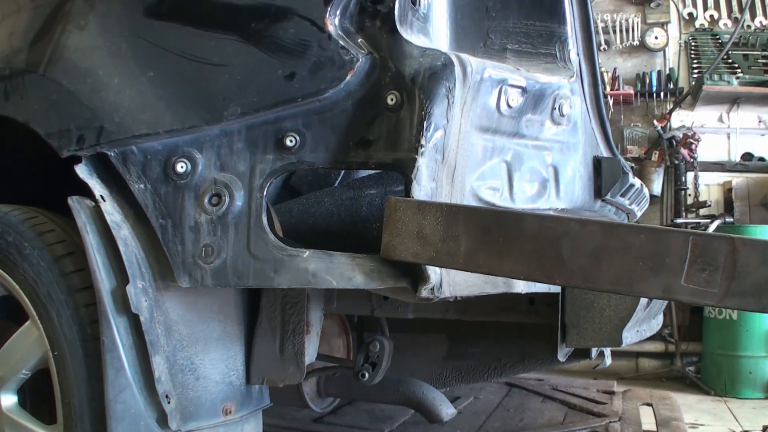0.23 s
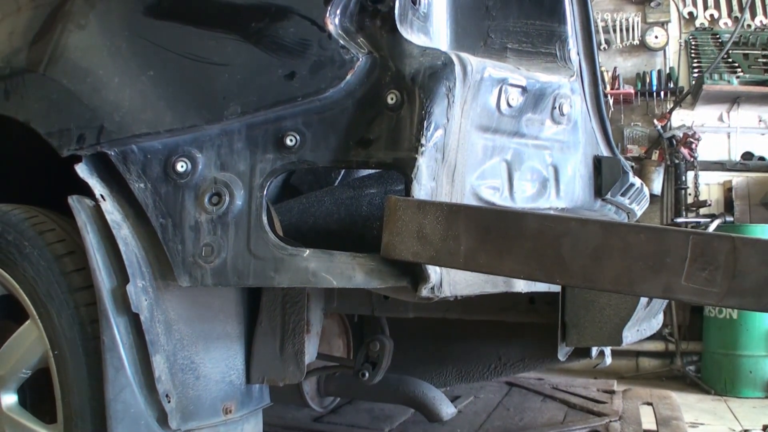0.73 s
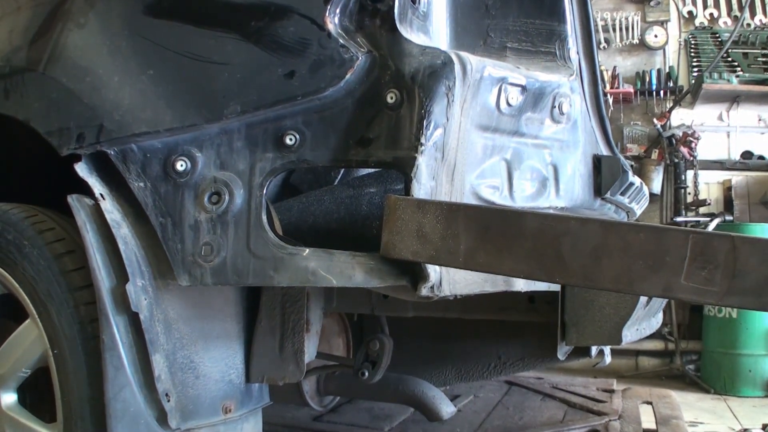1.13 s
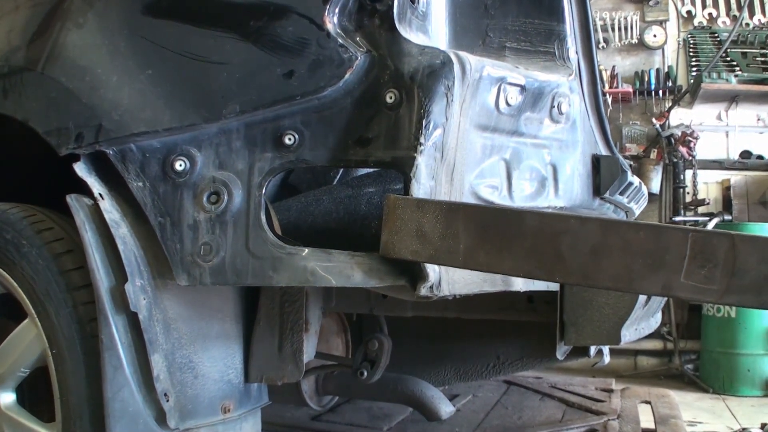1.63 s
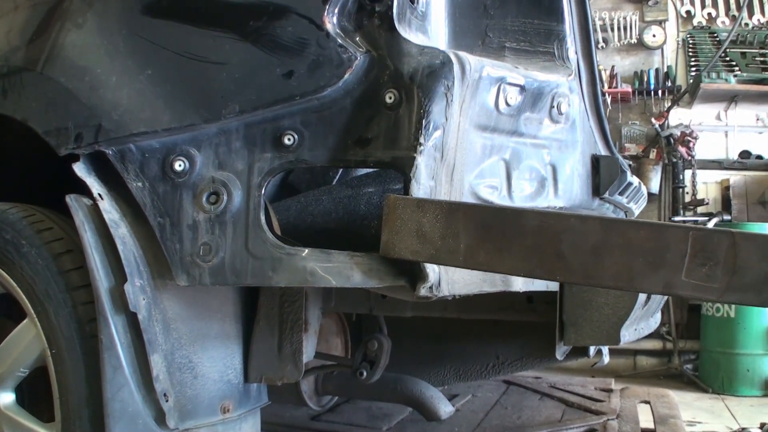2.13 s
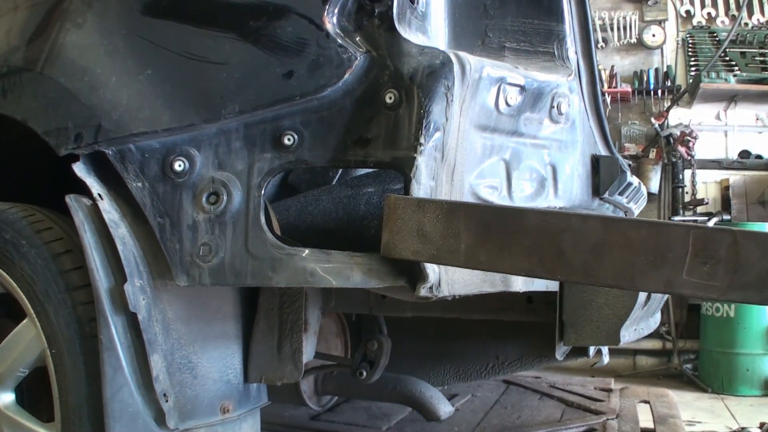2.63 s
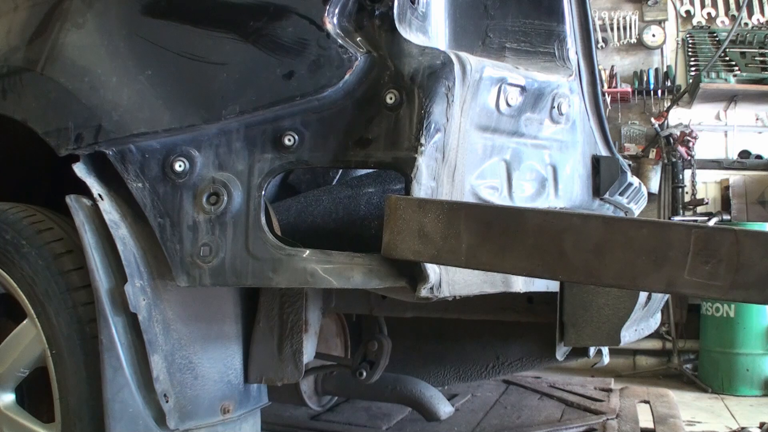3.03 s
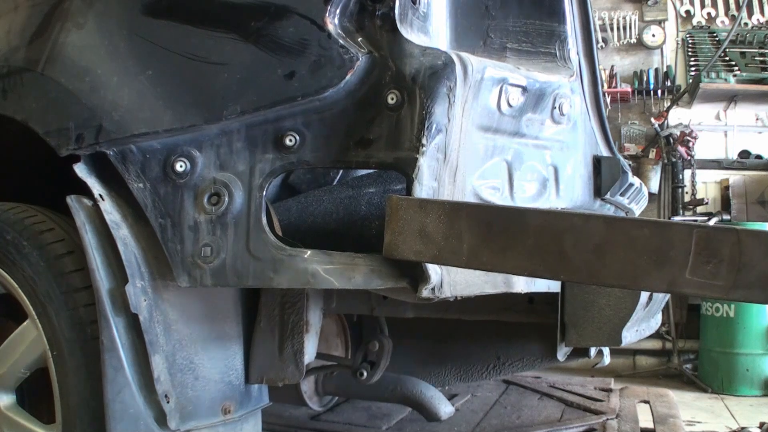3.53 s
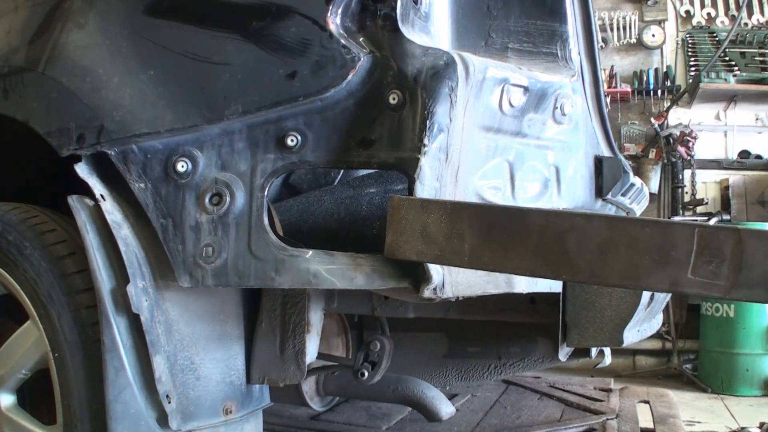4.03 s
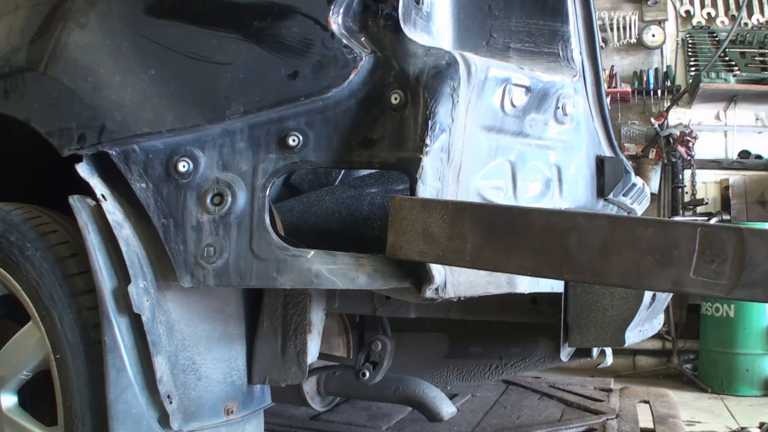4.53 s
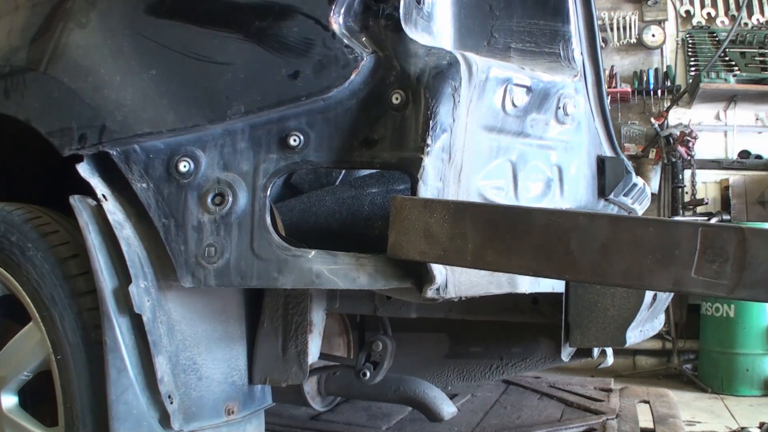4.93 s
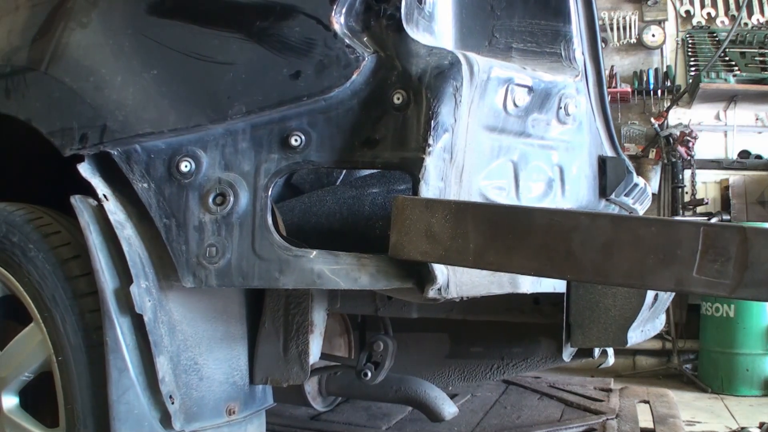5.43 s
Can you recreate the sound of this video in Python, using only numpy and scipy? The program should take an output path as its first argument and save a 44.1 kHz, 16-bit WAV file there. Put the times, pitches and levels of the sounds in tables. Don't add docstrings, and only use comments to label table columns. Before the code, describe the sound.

For the first 1.3 seconds a garage is fairly quiet: a compressor chugs at about twenty pulses a second over low rumble, and a hose leaks bright hiss that surges near 0.25, 0.6 and 0.95 seconds. At 0.54 a dropped tool taps and rings briefly. At 1.3 a valve handle knocks; a tiny high whistle, a swelling rush of air and a gliding squeal follow. At 1.4 the hydraulic pump bursts in, much louder, hammering about seventeen strokes a second and easing to fourteen by roughly 4 seconds. Each metallic clack has a hollow ring near 1.5 kilohertz, a low exhaust puff and a bright spit of air. Close reflections from floor, car and walls blur the blows into a dense rattle. Its ring climbs and clears with load, while automatic level control dips before each blow and lifts the echoes. It continues unbroken to the end, around 5.7 seconds, leaning slightly right.

```python
import sys
import numpy as np
from scipy import signal
from scipy.fft import rfft, irfft, next_fast_len
from scipy.io import wavfile
from scipy.ndimage import uniform_filter1d

SR = 44100
rng = np.random.default_rng(int(sys.argv[2]) if len(sys.argv) > 2 else 0)


def generate_wav(signal):
    frames = np.transpose(np.atleast_2d(signal))
    scaled = np.clip(frames, -1, 1) * 32767
    pcm = np.round(scaled).astype(np.int16)
    wavfile.write(sys.argv[1], SR, pcm)


def to_linear_factor(level_db):
    exponent = np.asarray(level_db, float) / 20
    return 10 ** exponent


N = 250929
t = np.arange(N) / SR


def level(x, db):
    return x * to_linear_factor(db) / np.sqrt(np.mean(x ** 2))


def shape(x, table):
    hz, db = np.transpose(table)
    n = next_fast_len(x.shape[-1])
    f = np.fft.rfftfreq(n, 1 / SR)
    gain = to_linear_factor(np.interp(np.log(f + 1), np.log(hz), db))
    return irfft(rfft(x, n) * gain, n)[..., :x.shape[-1]]


def ring(x, modes):
    n = next_fast_len(x.shape[-1])
    f = np.fft.rfftfreq(n, 1 / SR)
    gain = 1
    for hz, width, db in modes:
        damping = 1j * f * width
        gain = gain + (to_linear_factor(db) - 1) * damping / (hz ** 2 - f ** 2 + damping)
    return irfft(rfft(x, n) * gain, n)[..., :x.shape[-1]]


def band(lo_hz, hi_hz, channels=1):
    sos = signal.butter(2, [lo_hz, hi_hz], "band", fs=SR, output="sos")
    return level(signal.sosfilt(sos, rng.standard_normal((channels, N))), 0)


def walk(rate):
    k = int(SR / rate)
    held = np.repeat(rng.standard_normal(N // k + 1), k)
    return 2.4 * uniform_filter1d(uniform_filter1d(held, k), k)[:N]


def curve(table):
    s, *columns = np.transpose(table)
    return [np.interp(t, s, column) for column in columns]


# (stroke number, period [ms])
STROKE_PERIOD = [(0, 57.68), (2, 59.11), (9, 63.76), (18, 66.38), (30, 67.79), (38, 69.06), (44, 70.59),
                 (48, 69.91), (62, 70.79)]
FIRST_BLOW_S, BLOWS = 1.4069, 64
PERIODS_MS = np.interp(np.arange(BLOWS - 1), *np.transpose(STROKE_PERIOD))
STROKES = FIRST_BLOW_S + np.r_[0, np.cumsum(PERIODS_MS)] / 1000


def blows(size):
    train = np.zeros(N)
    train[np.round(STROKES * SR).astype(int)] = size
    return train


# (delay [ms], crack [dB], cylinder ring [dB],
# frame knock [dB], cylinder ring under full load [dB])
ECHOES = [(.9, 3, -14, 6, -12), (4.3, -12, -18, -12, -16), (7.6, -5, -11, -4, -1), (11, -12, -2, -10, -2),
          (14.7, -3, 0, -6, -10), (19, -2, -14, -8, -20), (22, -9, -16, -14, -10), (24.6, -1, 0, -12, 0),
          (28.2, -5, 0, -4, 0), (31.5, -12, -6, -7, -4), (34.5, -7, -14, -5, -6), (37.7, -6, -12, -5, -8),
          (40.6, -4, -12, -11, -7), (46, -7, -8, -9, -8), (48.7, -6, -9, -8, -10), (52, -8, -14, -4, -7),
          (56, -5, -13, -10, -7), (61, -7, -14, -10, -12)]
# (frequency [Hz], density [dB per Hz])
SLACK_COLOUR = [(88, -35), (150, -12), (252, -11.5), (525, -6.5), (850, -6.5), (1490, 2.5), (1770, -13),
                (3210, -5), (5510, -7.5), (7640, -10.5), (13100, -20.5), (13900, -23), (15000, -107)]
# (frequency [Hz], density [dB per Hz])
LOADED_COLOUR = [(88, -16.5), (150, -2), (238, -11), (674, -6), (1050, -6.5), (1510, -1.5), (1950, -13.5),
                 (3210, -6.5), (5300, -9.5), (7640, -12.5), (12600, -29), (13900, -20), (15000, -100)]
# (frequency [Hz], width [Hz], boost unloaded [dB], boost loaded [dB])
BODY_MODES = [(215, 73, -3.5, -15), (378, 60, -1, 4.5), (532, 49, 6.5, 6.5), (690, 74, 4, 7.5),
              (663, 570, -5, -10), (806, 18, 6.5, 7), (1150, 110, 3, 1.5), (1230, 95, 1.5, 0),
              (1310, 110, 0, -0.5), (960, 35, 1, 4), (1520, 260, 1.5, 3.5), (2210, 450, 5, 7.5),
              (2760, 50, 4.5, 6), (3000, 89, -1, 3), (3470, 97, -13, -8), (3700, 140, 3.5, -0.5),
              (4560, 110, 3, 5.5), (5430, 240, -1.5, -5), (6190, 68, 4.5, -9), (5950, 130, 5, 2.5),
              (6840, 160, -3, 6.5), (7660, 200, 5, 11), (9060, 310, 4.5, 5.5), (10650, 140, 4.5, 12.5),
              (11790, 340, 3.5, 15.5)]
# (frequency [Hz], level [dB])
FRESH_SHARE = [(200, -9), (700, -11), (1400, -10), (3000, -9), (7500, -9.5), (12000, -9)]
TAIL_T60_S = .44


def rattle():
    ms = np.arange(SR // 2) / SR * 1000
    cracks = sum(to_linear_factor(2 * db) * np.exp(-((ms - at) / 0.48) ** 2) for at, db, *_ in ECHOES)
    exhaust = 0.03 * np.exp(-((ms - 20) / 8) ** 2)
    decay = to_linear_factor(-2 * 60 * ms / 1000 / TAIL_T60_S)
    power = (1 - np.exp(-ms / 3) + 3 * cracks + exhaust) * decay
    load = 1 - np.exp(-(STROKES - STROKES[0]) / 1.95)
    size = to_linear_factor(.5 * rng.standard_normal(BLOWS))
    common = rng.standard_normal((2, len(ms)))
    out = 0
    modes = np.array(BODY_MODES)
    for share, colour, boost in ((1 - load, SLACK_COLOUR, 2), (load, LOADED_COLOUR, 3)):
        echo = np.sqrt(power) * (common + 0.66 * rng.standard_normal(common.shape))
        same = signal.fftconvolve(blows(size * share)[None], echo)[:, :N]
        swell = np.sqrt(np.abs(signal.fftconvolve(blows((size * share) ** 2), power)[:N]))
        new = shape(1.6 * swell * rng.standard_normal((2, N)), FRESH_SHARE)
        out = out + ring(shape(same + new, colour), np.c_[modes[:, :2], modes[:, boost]])
    return level(out, 0)


FULL_LOAD_S = 3.5, 4.4


def part_ring(hz, partials, decay_s, slack_column, loaded_column):
    s = np.arange(SR // 60) / SR
    out = np.zeros((2, N + SR))
    start = rng.standard_normal((len(ECHOES), len(partials), 2, 1)) * [[.9], [3]]
    for stroke in STROKES:
        speed = 2 * np.pi * hz[int(stroke * SR)]
        for echo, phases in zip(ECHOES, start):
            delay_s = echo[0] / 1000
            wave = 0
            for (multiple, db), phase in zip(partials, phases):
                wave = wave + to_linear_factor(db) * np.sin(multiple * speed * (s + delay_s) + phase)
            at = round((stroke + delay_s) * SR) - SR // 1000
            db = np.interp(stroke, FULL_LOAD_S, [echo[slack_column], echo[loaded_column]])
            gain = to_linear_factor(db - 60 * delay_s / TAIL_T60_S + 0.59 * rng.standard_normal())
            out[:, at:at + len(s)] += gain * s * np.exp(-s / decay_s) * wave
    return level(out[:, :N], 0)


# (frequency [Hz], level [dB], decay [ms])
STRIKE_MODES = [(643, -0.5, 0.69), (946, 1, 0.51), (1240, -14, .6), (4050, -0.5, 0.58), (6000, -7, 0.45),
                (7650, -7, .6)]


def strike():
    ms = np.arange(SR // 100) / SR * 1000
    wave = 0
    for hz, db, decay in STRIKE_MODES:
        envelope = ms / decay * np.exp(-ms / decay)
        wave = wave + to_linear_factor(db) * envelope * np.sin(2 * np.pi * hz * ms / 1000)
    clack = signal.fftconvolve(blows(to_linear_factor(rng.standard_normal(BLOWS))), wave)[:N]
    return level(np.array([clack, 0.5 * clack]), 0)


def vent():
    open_after_s, rise_s, fall_s = 0.0152, 0.0022, 0.0086
    s = np.arange(SR // 10) / SR - open_after_s
    load = 1 - np.exp(-(STROKES - STROKES[0]) / 0.99)
    spit = np.clip(s / rise_s, 0, 1) * np.exp(-s / fall_s)
    gate = signal.fftconvolve(blows(load * to_linear_factor(0.93 * rng.standard_normal(BLOWS))), spit)[:N]
    air = .7 * band(3020, 4460, channels=2) + 0.74 * band(6950, 8800, channels=2)
    air = air + 0.37 * band(10100, 13000, channels=2)
    return level(gate * air, 0)


# (frequency [Hz], side minus mid [dB])
SIDE_WIDTH = [(60, -20), (200, -13), (500, -9), (1300, -5.5), (2400, -7), (4400, -10.5), (6300, -15),
              (8500, -8), (10500, -1), (12500, -8.5)]
# (frequency [Hz], left minus right [dB])
BALANCE = [(60, 0.0), (110, -1), (200, -5), (380, -2.5), (700, -3.5), (1290, -5), (2380, -2.5),
           (4400, -1.5), (8120, 0.0), (15000, -2)]


def stereo(mid_side):
    mid, side = mid_side[0], shape(mid_side[1], SIDE_WIDTH)
    half = np.array(BALANCE) * [1, .5]
    return np.array([shape(mid + side, half), shape(mid - side, half * [1, -1])])


# (time [s], frequency [Hz], level [dB])
CYLINDER_LOAD = [(1.4, 1422, -5.5), (1.9, 1479, -3.5), (2.5, 1512, -1), (3.2, 1516, -0.5), (4, 1506, -1.5),
                 (5.7, 1557, -3.5)]
# (multiple, level [dB])
CYLINDER_PARTIALS = [(1.001, 1.5), (2.1, -7), (2.95, -11), (3.999, -9), (4.961, -6.5)]
# (multiple, level [dB])
FRAME_PARTIALS = [(0.994, -0.5), (0.79, -4.5), (1.2, -0.5), (1.43, -1), (1.68, -1)]


def pump():
    cylinder_hz, clear_db = curve(CYLINDER_LOAD)
    frame_hz = np.full(N, 678.8)
    cylinder = part_ring(cylinder_hz, CYLINDER_PARTIALS, 0.0015, slack_column=2, loaded_column=4)
    frame = part_ring(frame_hz, FRAME_PARTIALS, 0.0022, slack_column=3, loaded_column=3)
    rings = to_linear_factor(-6.0 + clear_db) * cylinder + to_linear_factor(-12.5 + clear_db) * frame
    return stereo(rattle() + rings + to_linear_factor(-16) * strike() + to_linear_factor(-14.5) * vent())


def puff(hz, ahead_s, width_s):
    s = np.arange(-SR // 20, SR // 20 + 1) / SR + ahead_s
    wave = np.exp(-(s / width_s) ** 2) * np.sin(2 * np.pi * hz * s)
    return signal.fftconvolve(blows(to_linear_factor(0.5 * rng.standard_normal(BLOWS))), wave, "same")


# (start [s], level [dB], change [dB per s])
INRUSH_PARTS = [
    (1.336, -13.5, -800),
    (1.335, -22.5, 60),
    (1.36, -21.5, -7),
]


def casing_squeal(start_s):
    glide = 1 - np.exp(-np.clip(t - start_s, 0, .1) / .017)
    hz = 860 + 560 * glide + 45 * walk(300)
    turn = 2 * np.pi * np.cumsum(hz) / SR
    tight = np.clip((t - start_s) / 0.023, 0, 1) ** 2
    tones = 1.04 * (1 - .75 * tight) * np.sin(turn)
    tones = tones + 0.77 * tight * np.sin(2 * turn)
    tones = tones + 0.96 * np.sin(np.pi * tight * .8) * np.sin(4 * turn)
    return to_linear_factor(3.8 * walk(150)) * tones


def inrush():
    open_s, shut_db_per_s = 0.0018, 1795
    shut = to_linear_factor(-shut_db_per_s * np.maximum(t - FIRST_BLOW_S, 0))
    gates = []
    for s, db, slope in INRUSH_PARTS:
        change_db = slope * np.clip(t - s, 0, FIRST_BLOW_S - s)
        gates.append(np.clip((t - s) / open_s, 0, 1) * to_linear_factor(db + change_db) * shut)
    whistle, rush, casing = gates
    tones = band(5860, 6140) + 0.38 * band(2600, 2800) + 0.27 * band(7100, 7200) + 0.37 * band(4600, 5300)
    air = 0.36 * band(1600, 6600) + 0.74 * band(830, 5400, channels=2) + 0.15 * band(11800, 13500)
    shake = 0.5 * band(660, 2000) + 0.29 * band(2600, 6100) + casing_squeal(INRUSH_PARTS[2][0])
    return whistle * level(tones, 0) + rush * air + casing * shake


# (time [s], peak [dB], pitch [Hz], rise [ms], t60 [ms])
KNOCKS = [
    (.5425, -25, 640, 1, 30),
    (.555, -25, 720, 3, 120),
    (.557, -30, 1050, 2, 70),
    (1.3012, -15, 640, 4, 45),
    (1.304, -22, 930, 2, 35),
    (.8, -37, 1318, 40, 900),
]
TOOL_TAP = .54135, -10.5, 630, .0011


def knocks():
    out = 0
    for s, db, hz, rise, t60 in KNOCKS:
        age = np.maximum(t - s, 0) * 1000
        envelope = to_linear_factor(db - 60 * age / t60) * (1 - np.exp(-age / rise))
        out = out + envelope * np.sin(2 * np.pi * hz * age / 1000)
    s, db, hz, half = TOOL_TAP
    return out - to_linear_factor(db) * np.exp(-((t - s) / half) ** 2) * np.sin(2 * np.pi * hz * (t - s))


# (multiple, level [dB])
CHUG_HARMONICS = [(1, -3), (2, 1.5), (3, -11), (4, -7), (5, 2), (6, -11), (7, -11), (8, -31), (9, -11.5),
                  (10, -31), (11, -16), (12, -16), (13, -16), (14, -20.5)]


def compressor():
    chug_hz, chug_at_s = 20.41, .5505
    turn = 2 * np.pi * chug_hz * (t - chug_at_s)
    chug = sum(to_linear_factor(db + walk(9.7)) * np.cos(k * turn + 0.59 * walk(6)) for k, db in CHUG_HARMONICS)
    chug = chug + to_linear_factor(-16.5 + 1.5 * walk(4.5)) * np.cos(35 * turn)
    return level(chug, -25.5)


# (peak [s], hiss [dB], lower part [dB], rise [s], fall [s])
LEAK_SURGES = [
    (.02, -48.5, -46.5, .02, 0.13),
    (.255, -37, -35, .04, 0.062),
    (.58, -37.5, -46, 0.017, .04),
    (.7, -43.5, -51, .06, .07),
    (.96, -38, -42, 0.052, 0.072),
    (1.25, -48, -54, 0.064, .2),
]


def leak():
    hiss, lower = to_linear_factor(-43.5), to_linear_factor(-60)
    for s, hiss_db, lower_db, rise, fall in LEAK_SURGES:
        surge = np.exp(-((t - s) / np.where(t < s, rise, fall)) ** 2)
        hiss = hiss + to_linear_factor(hiss_db) * surge
        lower = lower + to_linear_factor(lower_db) * surge
    bright = band(3940, 7860, channels=2) + 0.24 * band(8200, 13500, channels=2)
    air = hiss * bright + lower * band(1600, 3600, channels=2)
    return 0.85 * (air + 0.58 * air[::-1])


# (frequency [Hz], density [dB per Hz])
SHOP_COLOUR = [(15, -30), (25, 2), (107, -6.5), (152, -6.5), (349, -7.5), (552, -16.5), (722, -15),
               (782, -17), (1850, -28), (6380, -36.5), (10400, -42), (11800, -38.5), (15500, -51)]


def rumble():
    noise = shape(rng.standard_normal((2, N)), SHOP_COLOUR)
    mid, side = level(shape(noise, [(25, -18), (70, 0.5), (120, 0)]), 0)
    side = shape(side, [(60, -12), (300, -7.0), (2000, -6.5)])
    return to_linear_factor(-29) * np.array([mid + side, mid - side])


# (time [s], pump [dB], exhaust puff [dB], its sharper front [dB])
PUMP_LEVELS = [(1.42, -17.5, -38.5, -50), (1.9, -19, -35.5, -46), (2.5, -19, -33.5, -38),
               (2.9, -18.5, -35.5, -43), (3.3, -18.5, -39.5, -52), (4.0, -19, -37.5, -48),
               (4.9, -19, -40, -42), (5.69, -19, -35.5, -43)]
DUCK_DB, AHEAD_S = 4, .0025


def scene():
    pump_db, puff_db, front_db = curve(PUMP_LEVELS)
    exhaust = puff(122, 0.00952, 0.0047) * to_linear_factor(puff_db) + puff(260, 0.01347, 0.0031) * to_linear_factor(front_db)
    machine = pump() * (t > STROKES[0] - AHEAD_S) * to_linear_factor(pump_db + DUCK_DB + 9.5)
    machine = machine + exhaust * to_linear_factor(DUCK_DB + 20.5)
    garage = to_linear_factor([[.6], [-.6]]) * (compressor() + rumble() + leak())
    return machine + inrush() + knocks() + garage


def gain_db():
    dip_db, recover_s = 16, .07
    steps = STROKES - AHEAD_S
    last = np.searchsorted(steps, t) - 1
    db = -DUCK_DB - dip_db * np.exp(-(t - steps[last]) / recover_s)
    return uniform_filter1d(np.where(last < 0, 0, db), size=60)


def roll_off(x):
    return signal.sosfilt(signal.butter(12, 15720, fs=SR, output="sos"), x)


def record(dry):
    x = np.tanh(1.077 * dry * to_linear_factor(gain_db())) / 1.153
    loud = np.clip((t - 1.34) / .03, 0, 1)
    thin = shape(x, [(45, -3.5), (90, 1.5), (13650, -1.0), (14000, -45)])
    return roll_off(x + loud * (thin - x))


dry = scene()
out = record(dry)
generate_wav(out)
```